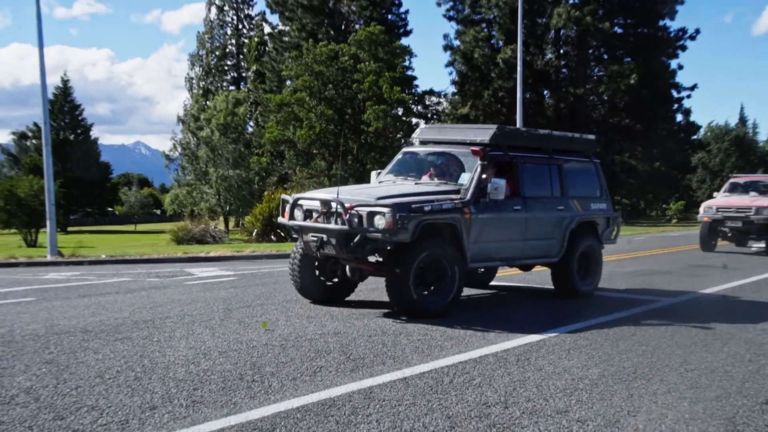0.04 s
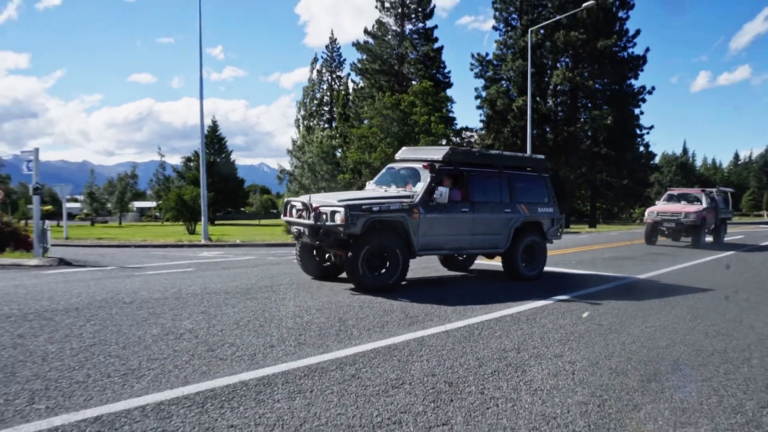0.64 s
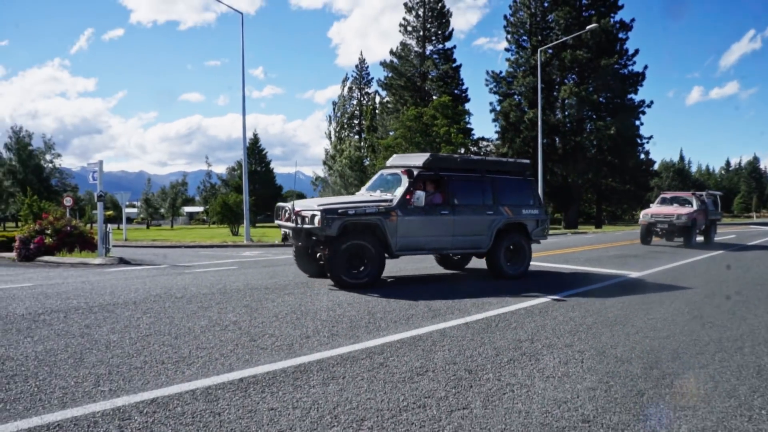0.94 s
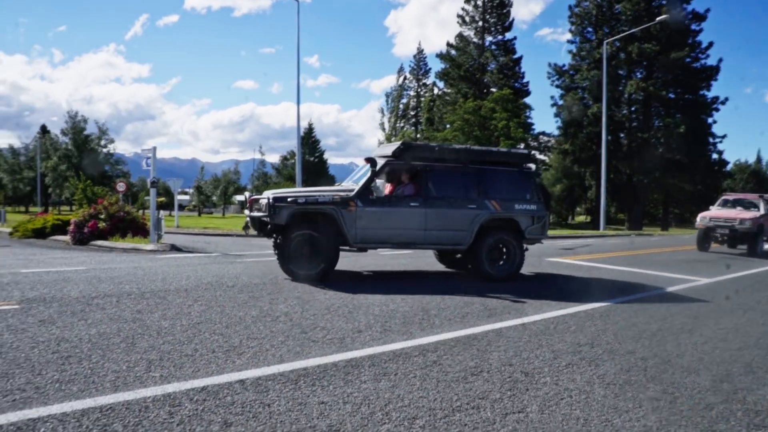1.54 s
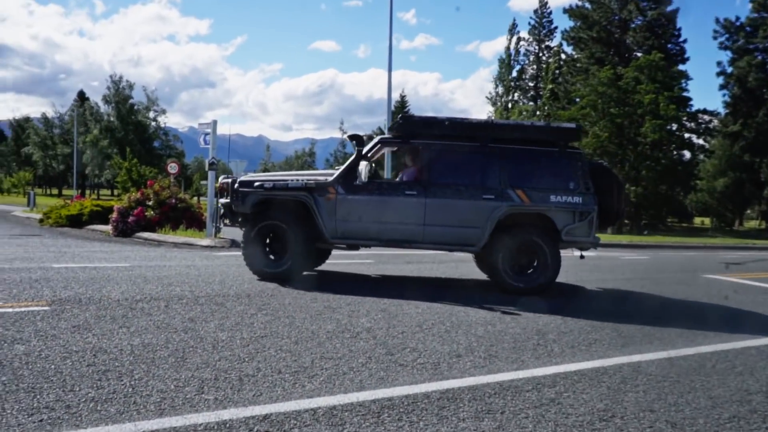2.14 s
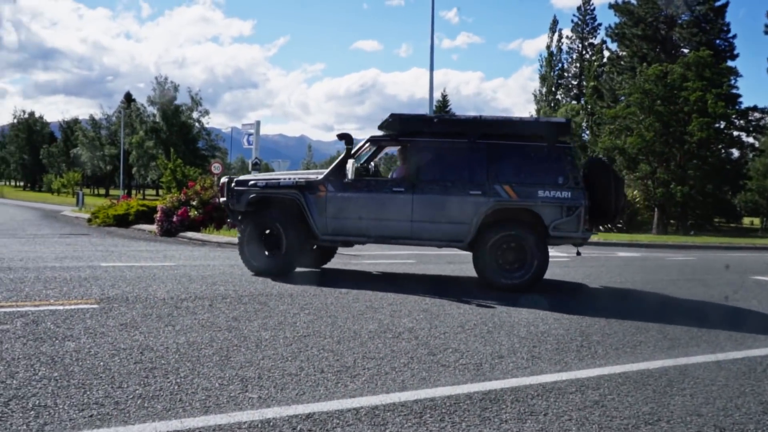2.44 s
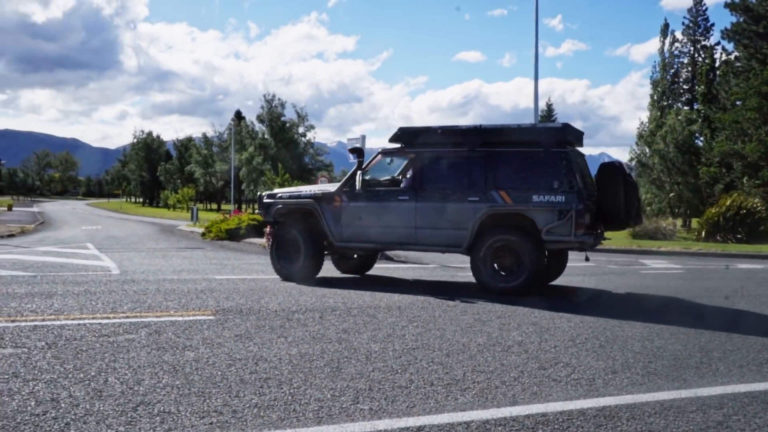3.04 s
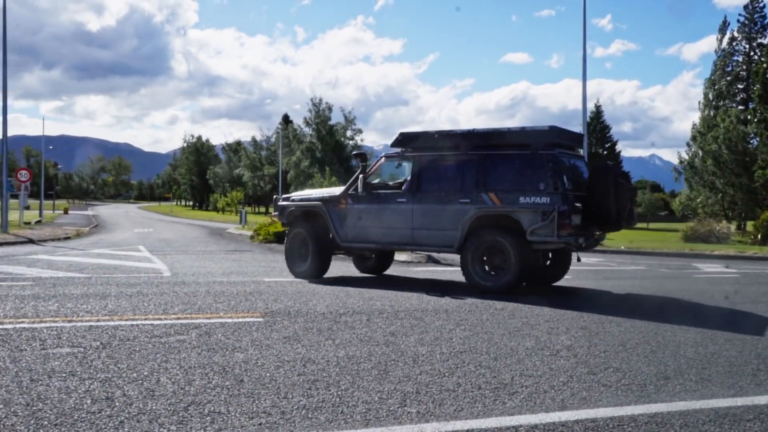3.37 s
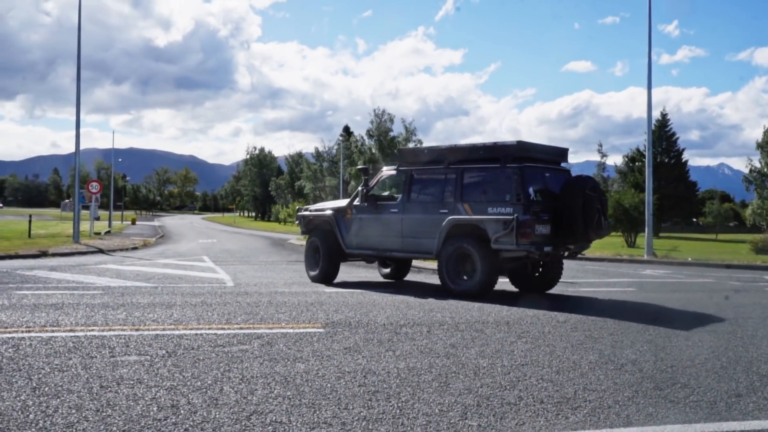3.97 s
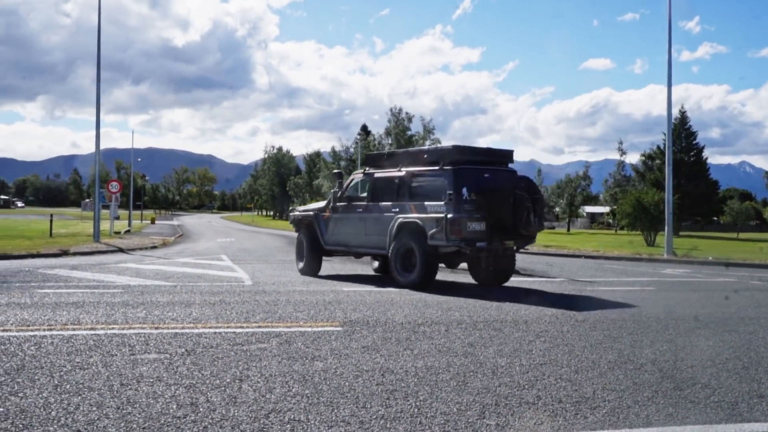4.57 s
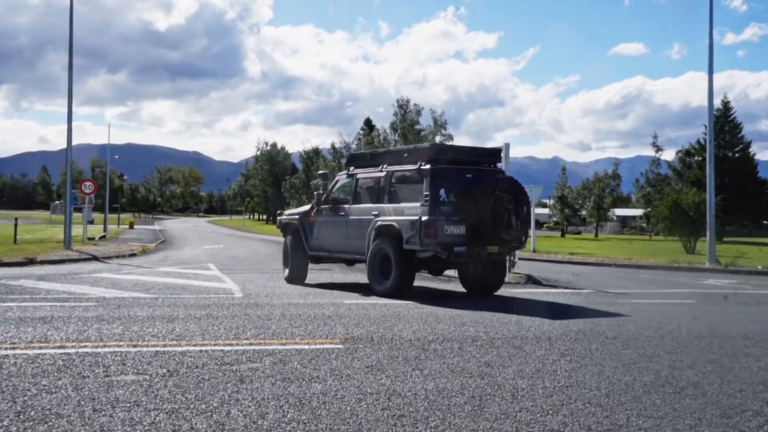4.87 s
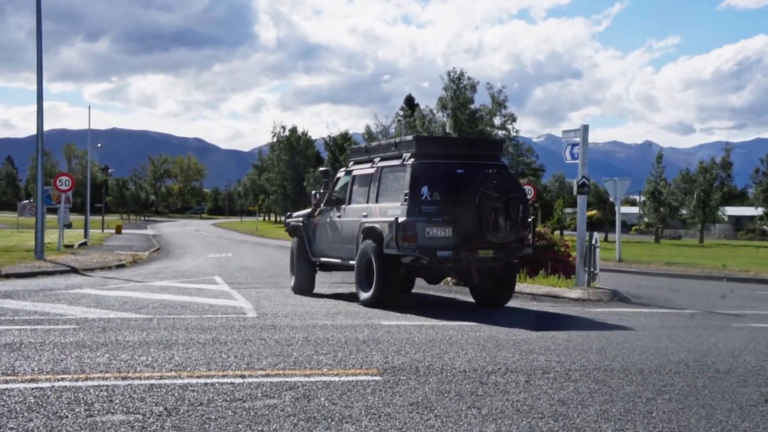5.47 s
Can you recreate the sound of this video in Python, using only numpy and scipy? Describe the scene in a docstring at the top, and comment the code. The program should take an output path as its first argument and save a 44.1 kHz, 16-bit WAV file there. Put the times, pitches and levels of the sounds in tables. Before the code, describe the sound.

A diesel four-wheel-drive rolls slowly past in gusty wind, its rear axle clacking sharply while the tyres scrub over grit.

```python
"""A diesel engine throbs through gusty wind, with sharp metal clacks and gritty scrapes.
A four-wheel-drive turns slowly past on coarse tarmac while another vehicle slows behind it.
Its damaged rear differential (the gears between the wheels) jams and lets go with clacks,
and the dragged tyres scrub over the grit. Wind buffets the microphone, at times so hard
that its diaphragm, the thin skin that picks up sound, sticks for a moment."""
import sys
import numpy as np
from scipy import signal
from scipy.fft import rfft, irfft, next_fast_len
from scipy.io import wavfile
from scipy.ndimage import uniform_filter1d

SR = 44100
rng = np.random.default_rng(int(sys.argv[2]) if len(sys.argv) > 2 else 0)


def master(y):
    """Save y as 16-bit WAV."""
    cut = np.clip(np.atleast_2d(y).T, -1, 1)
    pcm = np.round(cut * 32767)  # scale
    wavfile.write(sys.argv[1], SR, pcm.astype(np.int16))


N = 247401
TIME = np.arange(N) / SR
PANEL_RIPPLE_DB = 1.3  # many small panel resonances make a tone colour uneven

# the breeze between gusts: time_s, level_db
BREEZE = [(0, -12.5), (.5, -20), (1.0, -14.5), (1.2, -19.5), (1.9, -20), (2.15, -28.5), (2.45, -21.5),
          (3.1, -22), (3.4, -23), (3.8, -15.5), (4.55, -17.5), (5.0, -24), (5.61, -27.5)]
# gusts: peak_s, half_length_s, rumble_db, buffet_db
GUSTS = [(0.06, 0.03, -13, -19.5), (0.302, 0.037, -8, -39), (0.345, 0.026, -21, -20),
         (0.417, 0.027, -6.5, -30), (0.64, 0.045, -7.5, -18), (0.835, 0.11, -9.5, -22),
         (0.937, 0.023, -11.5, -20), (1.298, 0.022, -23, -33), (1.421, 0.05, -13, -32),
         (1.61, 0.034, -22, -20.5), (2.491, 0.026, -19, -22), (2.609, 0.048, -13, -15.5),
         (2.737, 0.092, -14, -20), (2.98, 0.053, -18.5, -20.5), (3.142, 0.041, -14.5, -20),
         (3.278, 0.035, -8.5, -34), (3.496, 0.024, -11, -22), (3.708, 0.073, -24, -16.5),
         (4.164, 0.058, -6, -12), (4.263, 0.085, -10, -12), (4.395, 0.035, -10.5, -15.5),
         (4.61, 0.052, -29, -21.5), (4.807, 0.072, -7, -18.5), (5.132, 0.087, -17, -27)]
# tone colours of the wind's rumble and buffeting: pitch_hz, level_db
RUMBLE_COLOUR = [(4, -7), (12, -1), (21, 0), (30, -2.5), (42, -7.5), (56, -14), (80, -24), (160, -44),
                 (500, -80), (16000, -160)]
BUFFET_COLOUR = [(25, -6.5), (52, -0.5), (80, 3), (115, -5), (170, -14), (300, -20), (600, -43.5),
                 (16000, -150)]
# surges that pin the diaphragm: start_s, length_s, pressure (1 is full scale)
STALLS = [(0.26, 0.0057, 0.99), (4.154, 0.0072, 0.56), (4.1958, 0.004, -0.19), (4.208, 0.0011, 1),
          (4.424, 0.0022, -0.43), (4.6092, 0.0098, 0.14), (4.6623, 0.033, -0.42), (4.792, 0.0057, 0.35),
          (4.8264, 0.013, 0.46), (4.869, 0.044, -0.26), (5.0863, 0.0126, 0.43)]

# exhaust drone of the vehicle behind: time_s, pitch_hz, level_db, octave_db
DRONE = [(0, 77, -46, -36), (.7, 73.35, -52, -38.5), (1.15, 71.3, -46, -40), (1.7, 69.3, -33.5, -47),
         (2.1, 68, -31.5, -38.5), (2.65, 65.5, -27, -50), (3.2, 61, -34, -38), (4.5, 60.5, -35, -55),
         (5.25, 60, -29, -59), (5.61, 60.4, -30, -40)]
# loudness of the four-wheel-drive as it passes: time_s, clatter_db, road_db, exhaust_db
PASSING = [(0, -36, -27, -34.5), (.28, -38.5, -32, -42), (.5, -36, -29.5, -37), (.75, -36, -31.5, -35.5),
           (1.15, -39.5, -37, -35.5), (1.5, -39, -34.5, -33.5), (1.9, -39, -33, -34.5),
           (2.3, -38, -34, -35), (2.8, -40.5, -38.5, -56), (3.3, -39.5, -36.5, -33.5),
           (4.0, -41.5, -32, -37), (4.5, -42.5, -37, -32.5), (5.0, -45.5, -38, -57),
           (5.61, -43.5, -39, -42)]
# tone colours of rolling tyres, engine block and the growl in the body: pitch_hz, level_db
ROAR_COLOUR = [(60, -24), (130, 6), (220, 1.5), (320, 2), (500, -0.5), (800, -6), (1100, -12.5),
               (2000, -30), (16000, -87)]
CLATTER_COLOUR = [(300, -36), (700, -5.5), (1250, -0.5), (1700, -1), (2400, -3.5), (3100, -8.5),
                  (3750, -8.5), (4400, -14.5), (5700, -17), (7000, -32.5), (8200, -34), (10000, -36.5),
                  (13000, -41.5), (15600, -47)]
GROWL_COLOUR = [(190, -33.5), (250, 7.5), (380, 16.5), (620, 2.5), (900, 5.5), (1300, -3), (1700, -38),
                (16000, -96)]
# resonances (favoured pitches) of the body panels: pitch_hz, width_hz, boost_db
BODY_RESONANCES = [(357, 26, 1), (497, 20, 3.5), (625, 12, 4.5), (846, 85, 3.5), (1190, 275, 8)]
# turbo whistle: time_s, pitch_hz, level_db
TURBO = [(0, 5080, -68), (.35, 5120, -61), (.95, 5090, -59.5), (1.3, 5060, -68), (1.6, 5050, -90)]
# engine speed: time_s, firings_per_s
FIRING_RATE = [(0, 61.5), (.45, 62.5), (.65, 59.5), (.9, 65.5), (1.2, 64), (1.5, 62.7), (2.2, 63.5),
               (2.7, 58), (3.1, 58.5), (3.4, 62.5), (3.6, 61.5), (4.35, 65.5), (4.6, 63.5), (5.0, 66.5),
               (5.61, 67.5)]
# tones in the exhaust note: multiple_of_firing_rate, level_db
EXHAUST_TONES = [(1, -8), (2, -10), (2.5, -14), (3, 0), (3.5, -17), (4, -15), (4.5, -16)]

# gear whine: time_s, turns_per_s, level_db
WHINE = [(1.7, 59.8, -80), (2.0, 59.4, -54), (2.25, 59.05, -48.5), (2.6, 58.95, -50), (2.85, 59.05, -46.5),
         (3.05, 59.4, -50), (3.3, 59.6, -80)]
# the multiples of that turning rate that sing
WHINE_MULTIPLES = [20, 21, 22, 23]
# driveline groans, each between two times: one_end_s, other_end_s, pitch_hz, width_hz, level_db
GROANS = [(-0.77, 0.28, 375, 10, -34), (-0.7, 1.32, 720, 180, -40), (1.3, 2.328, 290, 52, -40),
          (1.5, 2.65, 502, 6.6, -41.5), (1.5, 2.65, 560, 18, -47.5), (3.5, 4.15, 620, 12, -40),
          (-1.5, 0.61, 3050, 340, -56), (5.5, 5.18, 4650, 300, -53), (5, 5.5, 4850, 550, -52)]

# single stones under the tread: start_s, level_db, fade_s
STONES = [(1.729, -42, .004), (3.502, -50, .04), (3.726, -42, .04), (3.892, -43, .04), (4.32, -47, .03),
          (5.407, -48, 0.031)]
# slips of the dragged tyres: start_s, length_s, grind_db, grit_db
SLIPS = [(0.577, 0.12, -36, -51.5), (0.726, 0.088, -53, -65), (1.545, 0.03, -48, -52),
         (1.705, .032, -62, -64), (1.993, 0.079, -41, -56), (2.29, .09, -45, -54), (2.363, .045, -52, -53),
         (3.382, 0.1, -38, -71), (3.484, 0.071, -33, -49.5), (3.536, 0.16, -36.5, -50.5),
         (3.708, 0.11, -32, -43), (3.828, .05, -36, -47), (3.865, 0.092, -30.5, -41.5),
         (3.97, 0.13, -30, -42.5), (4.112, .12, -40, -48.5), (4.238, 0.031, -31, -43.5),
         (4.293, 0.054, -31.5, -44.5), (4.437, 0.063, -49, -58), (4.732, 0.1, -42.5, -58),
         (4.91, .04, -53, -59), (5.128, .055, -42, -52), (5.213, 0.077, -35, -47.5), (5.30, .05, -46, -56),
         (5.36, 0.069, -42.5, -47), (5.435, 0.04, -36, -48.5), (5.579, 0.028, -54, -50)]
# tone colours of a sharp little crack, the grinding and the grit: pitch_hz, level_db
CRACK_COLOUR = [(1000, -8), (4000, 8), (8000, 0), (12000, -6), (15600, -11)]
GRIND_COLOUR = [(120, 12.5), (250, -1), (650, 2), (1100, -3.5), (1700, -10), (2700, -4), (4000, -9),
                (5600, -23), (7200, -29), (16000, -76)]
GRIT_COLOUR = [(1500, 1.5), (4000, 16.5), (5500, 12.5), (7000, 5), (8300, -1), (10500, -0.5), (13000, -8),
               (15600, -17)]
# resonances of the grinding: pitch_hz, width_hz, boost_db
GRIND_RESONANCES = [(294, 23, 8), (627, 16, 13.5), (772, 44, 10), (1050, 60, 7), (1570, 270, 8),
                    (2670, 68, -18), (3530, 300, 1.5), (4100, 80, -1), (4430, 40, 3), (5930, 68, 0)]

# broken pieces chinking in the axle housing: start_s, pitch_hz, level_db
CHINKS = [(3.376, 3320, -39), (3.474, 1830, -34), (3.506, 3280, -37), (3.747, 2570, -31),
          (3.752, 1120, -33), (3.756, 2240, -32), (3.764, 1530, -32), (3.862, 2080, -37),
          (3.932, 3300, -37), (4.001, 2460, -32), (4.006, 1625, -31.5), (4.056, 3510, -35),
          (4.066, 2090, -33)]
# clacks of the differential: start_s, boom_db, thud_db, clank_db, rise_s, fade_s
CLACKS = [(0.531, -28, -43, -22, 0.0018, 0.12), (.546, -39, -22.5, -40, 0.0034, 0.071),
          (0.562, -41, -32, -37, 0.0049, 0.49), (1.289, -28, -32, -37, 0.014, 0.23),
          (1.549, -27, -24.5, -35, 0.012, 0.19), (1.61, -34, -37, -52, 0.0095, 0.17),
          (2.064, -29, -27, -42, 0.0037, 0.1), (2.074, -35, -31, -33.5, 0.0033, 0.17),
          (2.322, -37.5, -32.5, -35.5, 0.013, 0.19), (3.434, -39, -22.5, -29.5, 0.0049, 0.11),
          (3.483, -23, -27, -31, 0.0032, 0.091), (3.499, -24.5, -31, -32.5, 0.0029, 0.27),
          (3.675, -25, -54, -32, 0.0083, 0.15), (3.723, -27.5, -54, -45, 0.012, 0.24),
          (3.744, -40, -26.5, -33, 0.0068, 0.42), (3.923, -43, -35, -36, 0.0067, 0.52),
          (3.993, -36, -27.5, -30, 0.013, 0.19), (4.243, -36, -32, -37.5, 0.0055, 0.56),
          (5.208, -44, -29.5, -38, 0.0088, 0.24)]
# tone colours of a clack's chassis boom, housing thud, gear clank and tooth snap: pitch_hz, level_db
BOOM_COLOUR = [(90, -8.5), (170, -2), (250, 2.5), (330, -3), (480, -50), (16000, -130)]
THUD_COLOUR = [(220, 3.5), (400, -4), (560, 0.5), (800, -15.5), (1100, -32), (1600, -52), (16000, -100)]
CLANK_COLOUR = [(300, -22), (800, 9.5), (1700, 6), (3200, 4), (4500, -11), (6200, -14), (8000, -27),
                (11000, -29), (15600, -33)]
SNAP_COLOUR = [(1000, -30), (2300, 0), (3150, 4), (4200, -5), (6500, -14), (9000, -33), (15600, -46)]
# resonances of the axle housing: pitch_hz, width_hz, boost_db
AXLE_RESONANCES = [(200, 40, -1), (290, 38, -10), (401, 53, 10.5), (477, 92, -1), (599, 33, 9),
                   (790, 34, 4.5), (915, 18, 14.5), (1130, 76, 6.5), (1700, 370, 6.5), (2540, 100, 7.5),
                   (3300, 380, -1.5), (4150, 330, 3.5), (6860, 230, 5)]
# ringing of the crown wheel (the big gear) and the drive shaft: pitch_hz, level_db, fade_s
CROWN_WHEEL_TONES = [(1130, -8, .15), (1723, -2, .24), (2912, -7, .16), (3190, -1.5, .24), (4054, -1, .09),
                     (5254, -12, .14), (5700, -9, .06)]
SHAFT_TONES = [(516, 0, 0.21), (1640, -2, .13), (1730, -2, .07), (2280, -5, 0.094), (3630, -12, .12),
               (6280, -20, 0.13)]
# the one clack that also jars the shaft: start_s, level_db
SHAFT_BLOW = (2.07, -28)


def gain_of(db):
    """Turns decibels into a number to multiply by."""
    return 10 ** (np.asarray(db) / 20)


def evened(x):
    """Scales a signal to an average strength (rms) of 1."""
    return x / np.sqrt(np.mean(x ** 2) + 1e-20)


def curves(rows):
    """Joins a table's points into one curve over time for each column after the first."""
    times, *columns = np.transpose(rows)
    return [np.interp(TIME, times, column) for column in columns]


def coloured(x, colour, resonances=(), ripple_db=0):
    """Gives a signal a tone colour, resonances and random ripple; strength 1."""
    size = next_fast_len(N)
    hz = np.fft.rfftfreq(size, 1 / SR)
    colour_hz, colour_db = np.transpose(colour)
    db = np.interp(np.log(hz + 1), np.log(colour_hz + 1), colour_db)
    for centre, width, boost_db in resonances:
        db += boost_db / (1 + (2 * (hz - centre) / width) ** 2)
    panel_hz = np.geomspace(200, SR / 2, 330)
    db += ripple_db * np.interp(hz, panel_hz, rng.standard_normal(len(panel_hz)), left=0)
    return evened(irfft(rfft(x, size) * gain_of(db), size)[:N])


def noise():
    """An even hiss: white noise."""
    return rng.standard_normal(N)


def wander(hz):
    """A random drift with up to about hz wobbles a second; strength 1."""
    times = np.linspace(0, TIME[-1], num=16384)
    rates = np.fft.rfftfreq(len(times), times[1])
    drift = irfft(rfft(rng.standard_normal(len(times))) * np.exp(-(rates / hz) ** 2))
    return evened(np.interp(TIME, times, drift))


def grains(per_s, spread_db):
    """Scattered clicks of unequal size."""
    size = gain_of(spread_db * np.minimum(rng.exponential(1, N), 4))
    return evened(size * np.sign(noise()) * (rng.random(N) < per_s / SR))


def swell(start, rise_s, hold_s, fade_s):
    """A loudness shape: rises, holds until hold_s after the start, then drops 60 dB every fade_s."""
    age = np.maximum(TIME - start, 0)
    return np.minimum(age / rise_s, 1) * gain_of(-60 * np.maximum(age - hold_s, 0) / fade_s)


def pebbles(per_s, spread_db, fade_s, low_hz, high_hz, count):
    """Many small hard pieces, each pinging briefly at its own pitch; strength 1."""
    age = np.arange(0, fade_s, 1 / SR)
    out = np.zeros(N)
    for hz in low_hz + (high_hz - low_hz) * (np.arange(count) + rng.random(count)) / count:
        ping = gain_of(-60 * age / fade_s) * np.sin(2 * np.pi * hz * age)
        place, chance = rng.random((round(per_s * N / SR / count), 2)).T
        size = gain_of(spread_db * np.minimum(-np.log(1 - chance), 3))
        hits = np.bincount((place * N).astype(int), size, N)
        out += signal.oaconvolve(hits, ping)[:N]
    return evened(out)


def ringing(start, db, tones):
    """A steel part rings on after a blow."""
    age = np.arange(0, .4, 1 / SR)
    ring = np.zeros(len(age))
    for hz, tone_db, fade_s in tones:
        ring += gain_of(db + tone_db - 60 * age / fade_s) * np.sin(2 * np.pi * (hz * age + rng.random()))
    return np.pad(ring * np.minimum(age / .001, 1), (round(start * SR), N))[:N]


def eddies(colour):
    """Swirling air, evened out so that the gusts can set its strength."""
    air = coloured(noise(), colour)
    power = abs(uniform_filter1d(uniform_filter1d(air ** 2, size=3000), size=1500)) + 1e-9
    return evened(air / power ** .45)


def wind(buffet_trim_db=-3):
    """Gusts ride on a breeze; big slow swirls rumble and smaller ones buffet."""
    breeze_db, = curves(BREEZE)
    rumble, buffet = gain_of(breeze_db), gain_of(breeze_db - 12)
    for peak_s, half_length, rumble_db, buffet_db in GUSTS:
        gust = np.exp(-((TIME - peak_s) / half_length) ** 2)
        rumble = np.hypot(rumble, gain_of(rumble_db) * gust)
        buffet = np.hypot(buffet, gain_of(buffet_db) * gust)
    return rumble * eddies(RUMBLE_COLOUR) + gain_of(buffet_trim_db) * buffet * eddies(BUFFET_COLOUR)


def microphone(sound, air, surge_edge_s=.0044, crackle_db=-56):
    """A surge of wind pins the diaphragm, so no sound passes until it comes free with a crackle."""
    release = sum(swell(s + length, rise_s=.0005, hold_s=.0015, fade_s=.008) for s, length, _ in STALLS)
    sound = sound + gain_of(crackle_db) * release * coloured(noise(), CRACK_COLOUR)
    for start, length, pressure in STALLS:
        away_s = np.maximum(np.maximum(start - TIME, TIME - start - length), 0)  # 0 during the stall
        surge = np.exp(-(away_s / surge_edge_s) ** 2)
        air = air * (1 - surge) + pressure * surge
        sound = sound * np.minimum(away_s / .0005, 1)
    return sound + air


def vehicle_behind():
    """Its exhaust drone sinks in pitch as it slows."""
    hz, db, octave_db = curves(DRONE)
    angle = 2 * np.pi * np.cumsum(hz) / SR
    drone = gain_of(db) * np.sin(angle) + gain_of(octave_db) * np.sin(2 * angle)
    return np.sqrt(2) * gain_of(1.5 * wander(5)) * drone


def road_roar(lumpy_db=.5, trim_db=-.5):
    """Knobbly tyres roll over coarse tarmac and shake the underbody."""
    _, road_db, _ = curves(PASSING)
    level = gain_of(road_db + trim_db - lumpy_db * wander(23))
    return level * coloured(noise(), ROAR_COLOUR, BODY_RESONANCES)


def turbo():
    """A faint, fuzzy, fluttering whistle that fades as the throttle eases."""
    hz, db = curves(TURBO)
    whistle = np.sin(2 * np.pi * np.cumsum(hz + 20 * wander(10)) / SR)
    flutter = gain_of(1.2 * wander(30)) * wander(65)
    return gain_of(db) * evened(flutter * whistle)


def exhaust(firings):
    """One puff for each firing blends into a low, throbbing note; strength 1."""
    note = np.zeros(N)
    for multiple, db in EXHAUST_TONES:
        level = gain_of(db + 2 * wander(8))
        drift = .07 * wander(16)
        note += level * np.sin(2 * np.pi * (multiple * firings + drift + rng.random()))
    throb = gain_of(2.2 * wander(25) + 2.8 * np.sin(2 * np.pi * firings / 6))
    return evened(throb * note)


def engine(steady_noise=.56, growl_db=-4):
    """Each firing knocks the block, shakes the body and puffs the exhaust; the six cylinders differ."""
    firing_hz, = curves(FIRING_RATE)
    clatter_db, _, exhaust_db = curves(PASSING)
    firings = np.cumsum(firing_hz * (1 + .003 * wander(12))) / SR  # a running count
    cylinder_db = evened(rng.standard_normal(size=6))
    strength = gain_of(cylinder_db[firings.astype(int) % 6] + .8 * wander(40))
    knocks = (steady_noise + strength * np.exp(-(firings % 1))) * noise()
    clatter = coloured(knocks, CLATTER_COLOUR, [(1120, 110, .56), (3630, 200, 2.7)], PANEL_RIPPLE_DB)
    kicks = strength * np.diff(np.floor(firings), prepend=0)
    growl = gain_of(growl_db) * coloured(kicks, GROWL_COLOUR, BODY_RESONANCES)
    return gain_of(clatter_db) * (clatter + growl) + gain_of(exhaust_db) * exhaust(firings)


def gear_whine():
    """Turning gears whine faintly in a cluster of thin, wavering tones."""
    hz, db = curves(WHINE)
    angle = 2 * np.pi * np.cumsum(hz) / SR
    tones = sum(gain_of(3 * wander(4)) * np.sin(k * angle + .4 * wander(8)) for k in WHINE_MULTIPLES)
    return gain_of(db) * evened(tones)


def driveline_groans():
    """Badly meshing gears keep a few resonances singing, each swelling and fading."""
    out = np.zeros(N)
    for one_end, other_end, hz, width, db in GROANS:
        progress = np.clip((TIME - one_end) / (other_end - one_end), 0, 1)
        load = np.sqrt(abs(np.sin(np.pi * progress)))
        angle = 2 * np.pi * hz * TIME
        out += gain_of(db) * load * (wander(width) * np.cos(angle) + wander(width) * np.sin(angle))
    return out


def cracking_stones():
    """Single stones crack or spit out from under the tread."""
    cracks = sum(gain_of(db) * swell(s, .0004, .00087, fade_s) for s, db, fade_s in STONES)
    return cracks * coloured(noise(), CRACK_COLOUR)


def tyre_scrub(judder_db=1.5):
    """The jammed axle drags the tyres in short slips: they grind, steel rattles and grit crackles."""
    grind, grit = np.zeros((2, N))
    for start, length, grind_db, grit_db in SLIPS:
        sliding = swell(start, rise_s=.028, hold_s=length, fade_s=.29)
        grind = np.hypot(grind, gain_of(grind_db) * sliding)
        grit = np.hypot(grit, gain_of(grit_db) * sliding)
    rattle = pebbles(per_s=200, spread_db=3, fade_s=.045, low_hz=1300, high_hz=3900, count=20)
    scrape = noise() + .374 * rattle + .7 * grains(per_s=1500, spread_db=.5)
    grinding = coloured(scrape, GRIND_COLOUR, GRIND_RESONANCES, PANEL_RIPPLE_DB)
    pings = pebbles(per_s=8000, spread_db=3.5, fade_s=.015, low_hz=1500, high_hz=15500, count=45)
    clicks = grains(per_s=750, spread_db=3.2)
    crackle = coloured(noise() + 1.5 * pings + .95 * clicks, GRIT_COLOUR, ripple_db=PANEL_RIPPLE_DB)
    clumps = gain_of(1.3 * wander(60))
    return gain_of(judder_db * wander(70)) * (grind * grinding + grit * clumps * crackle)


def broken_pieces(fade_s=.12, gap_hz=55):
    """Each piece chinks with two close tones that beat against each other."""
    return sum(ringing(s, db, [(hz, 0, fade_s), (hz + gap_hz, -5, fade_s)]) for s, hz, db in CHINKS)


def differential(chatter=.52, hold_s=.00088, sudden_s=.0017, snap_db=4, ring_db=-1):
    """Gear teeth jump: each clack is a dying burst of tiny hits on gears, housing and chassis."""
    blows = np.zeros((4, N))
    ring = ringing(*SHAFT_BLOW, SHAFT_TONES)
    for start, boom_db, thud_db, clank_db, rise_s, fade_s in CLACKS:
        sudden = np.exp(-rise_s / sudden_s)  # quicker clacks snap and ring more
        sizes = gain_of([boom_db, thud_db, clank_db, clank_db + snap_db]) * [1, 1, 1, sudden]
        blows += np.outer(sizes, swell(start, rise_s, rise_s + hold_s, fade_s))
        ring += sudden * ringing(start, clank_db + ring_db, CROWN_WHEEL_TONES)
    boom, thud, clank, snap = blows
    teeth = noise() + chatter * grains(per_s=1000, spread_db=2.5)
    chassis = boom * coloured(noise(), BOOM_COLOUR)
    housing = thud * coloured(teeth, THUD_COLOUR, AXLE_RESONANCES)
    gears = clank * coloured(teeth, CLANK_COLOUR, AXLE_RESONANCES, 2 * PANEL_RIPPLE_DB)
    return chassis + housing + gears + snap * coloured(noise(), SNAP_COLOUR) + ring


def scene():
    """Both vehicles and the wind meet at one microphone."""
    axle = differential() + broken_pieces() + driveline_groans() + gear_whine()
    traffic = engine() + turbo() + road_roar() + vehicle_behind()
    tyres = tyre_scrub() + cracking_stones()
    return microphone(traffic + axle + tyres, wind())[None]


def record(dry, ease_s=.004, ceiling=.8, top_hz=15600):
    """Fades both ends, blocks steady pressure, rounds off the peaks and cuts the highest treble."""
    eased = dry * np.minimum(TIME / ease_s, 1) * np.minimum(TIME[::-1] / ease_s, 1)
    centred = signal.sosfilt(signal.butter(2, 8, "highpass", fs=SR, output="sos"), eased)
    rounded = centred / (1 + (centred / ceiling) ** 8) ** (1 / 8)
    treble_cut = signal.firwin(511, top_hz, window=("kaiser", 9), fs=SR)
    return signal.oaconvolve(rounded, treble_cut[None], "same")


dry = scene()
out = record(dry)
master(out)
```